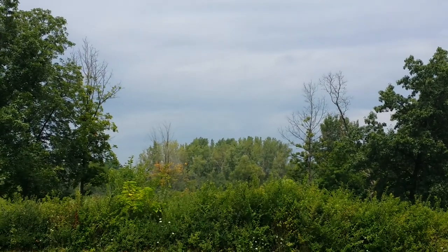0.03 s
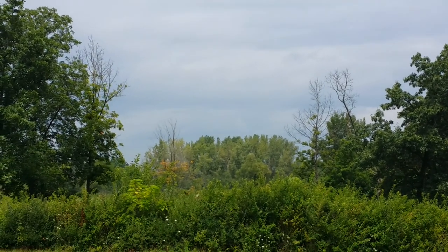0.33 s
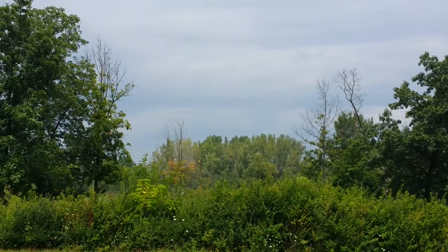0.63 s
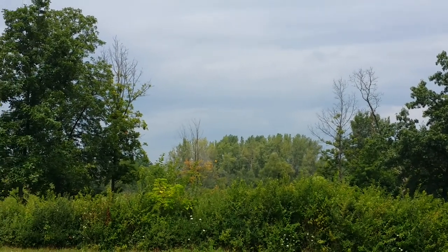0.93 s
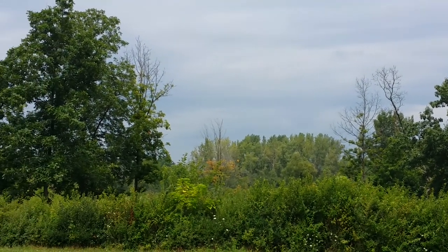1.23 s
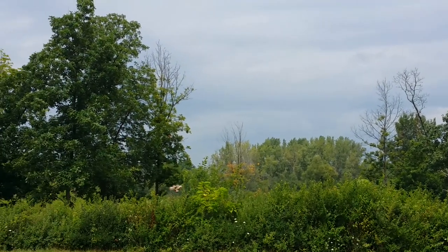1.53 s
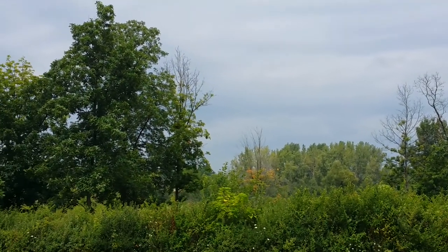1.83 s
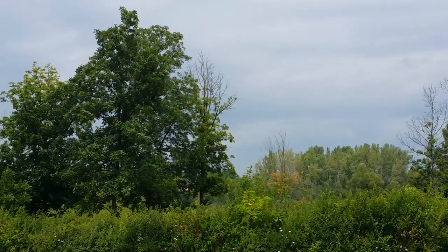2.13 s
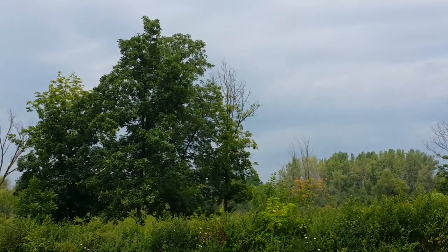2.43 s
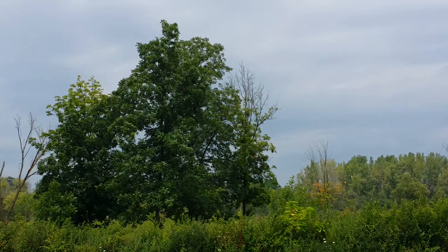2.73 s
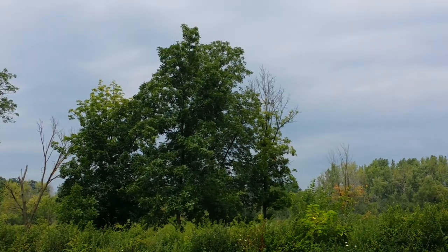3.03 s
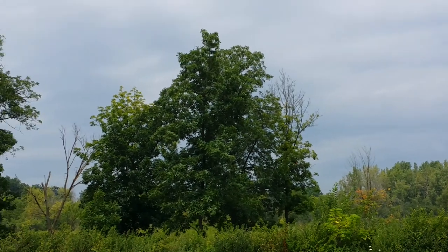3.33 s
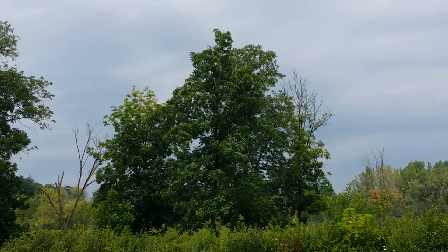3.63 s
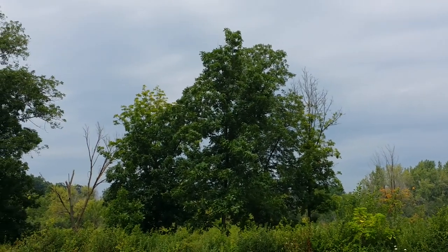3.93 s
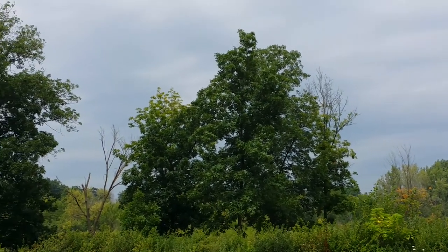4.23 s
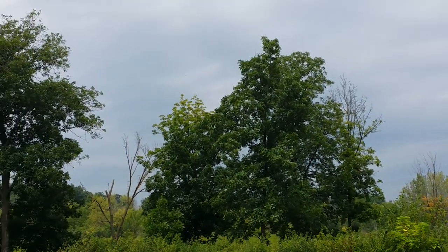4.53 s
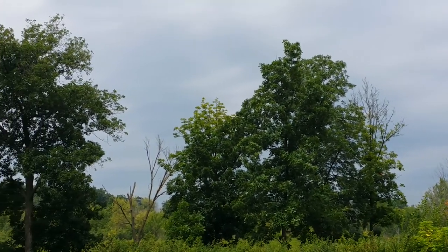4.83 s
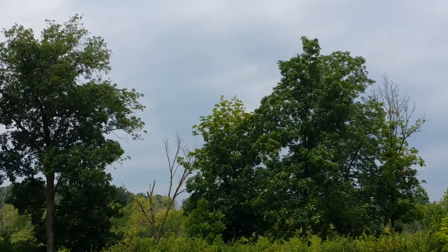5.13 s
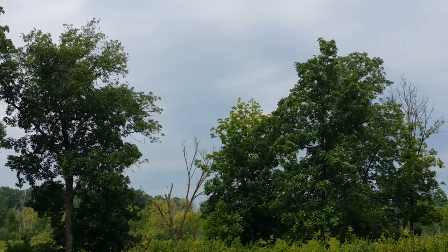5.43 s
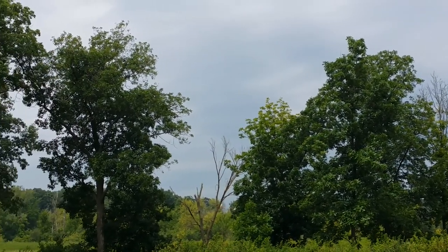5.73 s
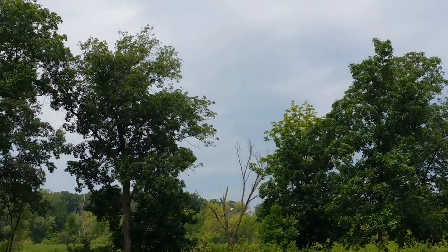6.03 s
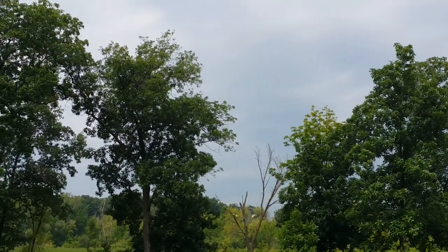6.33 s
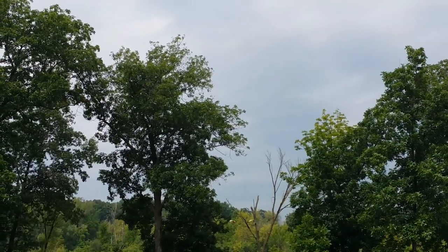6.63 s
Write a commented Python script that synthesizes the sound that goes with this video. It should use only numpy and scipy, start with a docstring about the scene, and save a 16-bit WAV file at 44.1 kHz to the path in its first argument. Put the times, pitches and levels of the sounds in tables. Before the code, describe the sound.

In an open meadow edged with trees, a pair of cranes gives three short duets of rolling rattles and brief bugles, each echoing off the tree line. Insects buzz shrilly throughout, strongest on the left and gradually fading. Sharp pops and clicks from handling hit the microphone, mostly in the first half, along with light gusts of wind. A faint machine hums far away, and a small bird twitters faintly near the end.

```python
"""A sandhill crane rattles and bugles across a meadow, and its mate joins in for three duets.
Slapping syrinx membranes ring their long windpipes; shrubs scatter the calls and the tree line answers.
Insects scrape their wings in the shrubs, a far machine hums, and late on a small bird twitters.
The hand-held camera turns away from the insects; handling pops and light wind hit its two
microphone ports."""
import sys
import numpy as np
from scipy import signal
from scipy.fft import rfft, irfft, next_fast_len
from scipy.io import wavfile
from scipy.ndimage import map_coordinates

SR = 44100
rng = np.random.default_rng(int(sys.argv[2]) if len(sys.argv) > 2 else 0)


def persist_wave(psi):
    """Save psi, clipped to +-1, as 16-bit WAV."""
    counts = np.round(np.clip(psi, -1, 1) * 32767).astype(np.int16)
    wavfile.write(sys.argv[1], SR, np.atleast_2d(counts).T)


N = 298998


def amp(db):
    """Decibels to gain."""
    return 10 ** (np.asarray(db) / 20)


def unit(x):
    """Scale to rms 1."""
    return x / np.sqrt(np.mean(x ** 2) + 1e-20)


def along(points, hz):
    """Read (frequency, value) points at hz, on a log axis."""
    freqs, values = np.transpose(points)
    return np.interp(np.log(hz + 1), np.log(freqs + 1), values)


def curves(rows):
    """One value per sample for each column after the time."""
    times, *columns = np.transpose(rows)
    return [np.interp(np.arange(N) / SR, times, column) for column in columns]


def wobble(rate, size=N):
    """A smooth random curve, rate knots a second."""
    knots = rng.standard_normal(int(size * rate / SR) + 4)
    return map_coordinates(knots, [np.arange(size) * rate / SR])


def cycles(hz):
    """Running phase in radians."""
    return 2 * np.pi * np.cumsum(hz) / SR


def coloured(x, spectrum):
    """x through a (frequency [Hz], level [dB]) spectrum, at rms 1."""
    size = x.shape[-1]
    m = next_fast_len(2 * size)
    gain = amp(along(spectrum, np.fft.rfftfreq(m, 1 / SR)))
    return unit(irfft(rfft(x, m) * gain, m)[..., :size])


def add(track, at, sound):
    """Mix a sound into a track, at a time in seconds."""
    start = max(0, round(at * SR))
    track[start:start + len(sound)] += sound[:N - start]


def glide(length, start, middle, end):
    """Progress 0-1 through a note, and its pitch curving through three points."""
    u = np.linspace(0, 1, max(64, int(length * SR)))
    return u, np.polyval(np.polyfit([0, .5, 1], [start, middle, end], 2), u)


def plateau(at, length, edge_s):
    """One smooth rise, hold and fall (0-1) on a scene-long track."""
    t = np.arange(N) / SR - at
    return np.sin(np.pi / 2 * np.clip(np.minimum(t, length - t) / edge_s + .25, 0, 1)) ** 2


# open air over the meadow: (frequency [Hz], density [dB])
AIR_SPECTRUM = [(25, -25), (70, 6), (150, -6), (300, -13.5), (500, -15), (1000, -14.5), (2000, -20.5),
                (3000, -22), (6000, -29.5), (12000, -27.5), (15200, -31.5), (16000, -49)]
def open_air():
    """A faint, wide wash, different at each port."""
    return amp(-52) * coloured(rng.standard_normal((2, N)), AIR_SPECTRUM)


# a machine far off, centred: (time [s], level [dB])
HUM_LEVEL = [(0, -60), (1.5, -51), (3.3, -48), (3.9, -48.5), (4.7, -48), (4.85, -62), (5.4, -65),
             (5.6, -48.5), (6.78, -53)]
# its partials: (multiple of the pitch, level [dB])
HUM_PARTIALS = [(.5, -31), (1, -3), (2, -23.5)]
def far_machine():
    """A low hum that wavers slightly in pitch and level."""
    hum_db, = curves(HUM_LEVEL)
    phase = cycles(140 * (1 + 0.0044 * wobble(3.65)))
    tone = unit(sum(amp(db) * np.sin(k * phase) for k, db in HUM_PARTIALS))
    return amp(hum_db - 2 + wobble(6.8)) * tone


# wind on the microphone: (time [s], length [s], port [0 left, 1 right], rumble [dB], eddies [dB])
PORT_GUSTS = [(0, 0.82, 0, -32, -32.5), (0.931, 0.13, 1, -35, -38), (1.573, 0.65, 0, -41.5, -46.5),
              (1.8, 0.35, 1, -37.5, -49), (2.408, 0.092, 1, -34.5, -61), (4.65, 1.23, 1, -53.5, -63),
              (5.82, 0.57, 0, -34.5, -55), (5.828, .25, 1, -30.5, -41), (6.052, 1.07, 1, -36, -52)]
# rumble between gusts: (left [dB], right [dB])
BREEZE = [-59, -53.5]
# buffeting at a port: (frequency [Hz], density [dB])
RUMBLE_SPECTRUM = [(20, -59), (45, -6), (75, 3.5), (140, -1.5), (200, -12), (300, -21.5), (500, -44),
                   (1200, -53)]
# small eddies in strong gusts: (frequency [Hz], density [dB])
EDDY_SPECTRUM = [(60, -39), (130, 4), (190, -1), (280, -12.5), (400, -21), (800, -39)]
def wind():
    """Each gust buffets one port, in separate bumps, over a faint breeze."""
    rumble_gain, eddy_gain = amp(BREEZE)[:, None] * np.ones(N), np.zeros((2, N))
    for at, length, port, rumble_db, eddy_db in PORT_GUSTS:
        gust = plateau(at, length, edge_s=0.1)
        rumble_gain[round(port)] += amp(rumble_db) * gust
        eddy_gain[round(port)] += amp(eddy_db) * gust
    bumps = unit(amp(8.2 * np.tanh([wobble(20), wobble(20)])))
    rumble = rumble_gain * coloured(rng.standard_normal((2, N)), RUMBLE_SPECTRUM)
    eddies = eddy_gain * coloured(rng.standard_normal((2, N)), EDDY_SPECTRUM)
    return amp(-1) * bumps * (rumble + eddies)


# static-like pops right at the microphone: (time [s], level [dB], port [0 left, 1 right], rise [s])
PORT_POPS = [(0.26, -10, 0, 0.000042), (0.49, -2.5, 1, 0.000084), (1.7844, -7, 0, 0.000043),
             (1.8895, -9.5, 0, 0.000042), (2.0096, -0.5, 0, 0.000062), (2.0621, -14, 0, 0.000045),
             (2.0863, -2, 0, 0.000048), (2.1109, -9.5, 0, 0.000022), (2.8168, 3.5, 1, 0.00017),
             (2.8705, -2.5, 0, 0.000024), (2.882, 1, 0, 0.00012), (2.8894, -4, 0, 0.000072),
             (3.1631, 0.5, 0, 0.000037), (3.5233, -3, 1, 0.00005), (5.5724, -21, 0, 0.000069)]
# the housing clicks by the right port: (time [s], level [dB])
HOUSING_CLICKS = [(1.5936, 0.5), (5.9610, -8)]
# fingers brush the housing on that side: (time [s], length [s], level [dB])
FINGER_BRUSHES = [(0.282, 0.089, -36.5), (2.653, 0.098, -37), (5.953, 0.034, -36), (6.238, 0.013, -42.5)]
# their friction: (frequency [Hz], density [dB])
BRUSH_SPECTRUM = [(300, -5), (900, 4.5), (2000, -5), (4500, -4), (8000, -9), (15000, -22)]
def handling():
    """Pops are pressure steps that swing back through the bass cut; the housing rings and rustles."""
    steps, housing = np.zeros((2, N)), np.zeros((2, N))
    t = np.arange(SR // 8) / SR
    for at, db, port, rise in PORT_POPS:
        add(steps[round(port)], at, amp(db + 1) * (1 - np.exp(-t / rise)) * np.exp(-t / 0.0022))
    for at, db in HOUSING_CLICKS:
        ring = np.cos(2 * np.pi * 780 * t) * amp(-60 * t / 0.0074)
        add(housing[1], at, amp(db) * ring * (1 - np.exp(-t / .00006)))
    for at, length, db in FINGER_BRUSHES:
        swell = np.hanning(int(length * SR))
        add(housing[1], at, amp(db) * swell * coloured(rng.standard_normal(len(swell)), BRUSH_SPECTRUM))
    bass_cut = signal.butter(4, 66, "high", fs=SR, output="sos")
    return signal.sosfilt(bass_cut, steps) + housing


# a faint bird, centred: (time [s], length [s], start [Hz], middle [Hz], end [Hz], level [dB])
BIRD_TWEETS = [(5.275, 0.055, 6520, 5200, 5100, -57), (5.462, .08, 3480, 3720, 4200, -67),
               (5.627, .12, 7100, 5320, 5070, -61.5), (5.843, 0.085, 3300, 3650, 3850, -67)]
def small_bird():
    """Thin slurred whistles with a slight quaver."""
    song = np.zeros(N)
    for at, length, start, middle, end, db in BIRD_TWEETS:
        u, pitch = glide(length, start, middle, end)
        whistle = np.sin(cycles(pitch * (1 + 0.014 * wobble(297, len(u)))))
        add(song, at, amp(db + 5) * np.sin(np.pi * u) * whistle)
    return song


def wing_buzz(spectrum, envelope, stroke_hz, chop):
    """Files scrape at the wing-stroke rate; many wings give many small resonances."""
    strokes = 1 + chop * np.cos(cycles(stroke_hz * (1 + 0.041 * wobble(25))))
    hz = np.arange(2000, 16000, 70)
    resonances = np.column_stack([hz, along(spectrum, hz) + 3.7 * rng.standard_normal(len(hz))])
    scrape = coloured(rng.standard_normal(N), [(1000, -70), *resonances])
    return unit(scrape * strokes * envelope * amp(0.62 * wobble(6.6)))


# the insect nearest the microphone sings: (time [s], length [s])
SINGER_BOUTS = [(-.032, 0.73), (1.156, 2.55)]
def singer_rhythm(tired_hz=17.2, fresh_extra_hz=3.82, tire_s=1):
    """The near insect's presence (0-1) and beat (-1 to 1), which slows as it tires in each bout."""
    presence, beat = np.zeros(N), np.zeros(N)
    for at, length in SINGER_BOUTS:
        t = np.maximum(np.arange(N) / SR - at, 0)
        beat_count = tired_hz * t + fresh_extra_hz * tire_s * (1 - np.exp(-t / tire_s))
        bout = plateau(at, length, edge_s=0.19)
        presence += bout
        beat -= bout * np.cos(2 * np.pi * beat_count)
    return presence, beat


# choruses in the shrubs on either side, fading as the microphone turns away: (time [s], level [dB])
LEFT_LEVEL = [(0, -34), (1.9, -35), (3.4, -36), (3.9, -38.5), (5.3, -39.5), (5.75, -44), (6.78, -45)]
RIGHT_LEVEL = [(0, -42), (.5, -41.5), (1.8, -45.5), (3, -49), (3.9, -57), (4.6, -52.5), (6.78, -55.5)]
# a narrow-voiced insect, at both ports: (time [s], level [dB])
THIN_LEVEL = [(0, -52), (3.7, -78), (4, -58.5), (4.6, -46.5), (5.1, -61), (5.6, -62)]
# wings of the choruses, the near singer and the narrow voice: (frequency [Hz], density [dB])
LEFT_WINGS = [(3000, -31), (4000, -17), (4600, -7), (5300, -5.5), (5750, -3.5), (6100, -2), (6550, 4),
              (7250, 0), (7700, -3), (9000, -20), (10200, -19.5), (13000, -69)]
RIGHT_WINGS = [(3000, -12), (4500, -8.5), (5700, -8), (7500, -9), (8600, 3), (9600, 1.5), (10300, -3.5),
               (11200, -9.5), (12000, -17.5), (14000, -16), (16000, -67)]
SINGER_WINGS = [(5600, -34.5), (6300, -3.5), (6600, 1.5), (7250, 3.5), (7700, -14), (8500, -32)]
THIN_WINGS = [(4800, -30), (5450, -28), (5720, -11), (6000, -17), (6500, -38)]
def insects():
    """A singer close on the left throbs over the chorus, then stops; a shriller group is on the right."""
    left_db, = curves(LEFT_LEVEL)
    right_db, = curves(RIGHT_LEVEL)
    thin_db, = curves(THIN_LEVEL)
    presence, beat = singer_rhythm()
    throb = np.sqrt(np.abs(1 + 0.48 * beat))  # the choruses pulse in time with the singer
    left = amp(left_db - 5) * wing_buzz(LEFT_WINGS, throb, stroke_hz=134.8, chop=0.25)
    right = amp(right_db - 0.5) * wing_buzz(RIGHT_WINGS, throb, stroke_hz=127.5, chop=0.21)
    spill_from_left = amp(left_db - 16) * wing_buzz(LEFT_WINGS, throb, stroke_hz=125.3, chop=0.72)
    singer = amp(-49.5) * wing_buzz(SINGER_WINGS, presence + 0.47 * beat, stroke_hz=136.5, chop=0.29)
    thin = amp(thin_db - 4) * coloured(rng.standard_normal((2, N)), THIN_WINGS)
    return np.array([left + singer, right + spill_from_left]) + thin


# colour of the echo off the tree line: (frequency [Hz], level [dB])
TREE_COLOUR = [(500, 3), (1000, 1), (1900, 3.5), (5000, 19)]
# its decay, longest in the bass: (frequency [Hz], time to fall 60 dB [s])
TREE_DECAY = [(300, 2.4), (1000, 1.08), (2000, 1.08), (5000, 1)]
def meadow(calls, shrubs_db=6, trees_db=-3.5, delay_s=0.029):
    """Near shrubs scatter the calls at once; the tree line answers later and dies slowly."""
    hz, t, noise = signal.stft(rng.standard_normal((2, SR)), SR, nperseg=256)
    shrubs = amp(shrubs_db - 60 * t / .13)
    arrival = 1 / (1 + np.exp((delay_s - t) / 0.018))
    decay_db = 60 * t / along(TREE_DECAY, hz)[:, None]
    trees = arrival * amp(trees_db + along(TREE_COLOUR, hz)[:, None] - decay_db)
    tail = signal.istft(noise * (shrubs + trees), SR, nperseg=256)[1] / np.sqrt(SR)
    return signal.fftconvolve(calls[None], tail, axes=1)[:, :N]


def windpipe(x, throat):
    """Each slap rings on in the windpipe (a minimum-phase filter); rms 1."""
    m = 2 * next_fast_len(len(x) + 2048)
    cepstrum = irfft(np.log(amp(along(throat, np.fft.rfftfreq(m, 1 / SR)))))
    response = np.exp(rfft(2 * cepstrum[:m // 2], m) - cepstrum[0])
    return unit(irfft(rfft(x, m) * response)[:len(x)])


def syrinx(hz, rough, throat, jitter, slap):
    """A harmonic-rich tone; when rough, the membranes slap once every four cycles."""
    phase = cycles(hz * (1 + jitter * (rough + .15) * wobble(413, len(hz))))
    slap_phase = phase / 4 + rng.uniform(0, 2 * np.pi)
    sway = rough * (0.96 * np.sin(slap_phase) + 0.59 * np.sin(2 * slap_phase))  # early and late cycles
    reach = 3 + 12 * rough  # smooth notes lose their upper harmonics
    tone = sum(np.cos(k * (phase + sway)) / (1 + (k / reach) ** 4) for k in range(1, 13))
    slaps = np.exp(slap * rough * np.cos(slap_phase))
    flutter = 1 + .5 * rough * np.tanh(wobble(344, len(hz)))
    return windpipe(tone * slaps * flutter, throat)


def rattle(rattles, hurry, chip_s):
    """Chips (time [s], level [dB], pitch [Hz], length [s]), each gap shorter than the last."""
    for start, end, first_gap, db, drop_db, first_hz, last_hz in rattles:
        gaps = first_gap * np.arange(1, 10) ** -hurry
        times = start + np.append(0, np.cumsum(gaps))
        times = times[times < end]
        for at, u in zip(times, np.linspace(0, 1, len(times))):
            level = db - drop_db * u ** 6.3 + 0.67 * rng.standard_normal()  # holds until the last chips
            hz = (first_hz + (last_hz - first_hz) * u) * (1 + 0.0073 * rng.standard_normal())
            yield at, level, hz, chip_s


def crane(chips, notes, throat, sag=0, chip_rough=0, chip_db=0, note_db=0, clearing=0):
    """Breath drives abrupt, sagging chips, and held notes that may start rough and then clear."""
    voice = np.zeros(N)
    for at, db, hz, length in chips:
        u, pitch = glide(length, hz * (1 + sag / 2), hz * (1 - sag / 2), hz * (1 - 2.63 * sag))
        breath = (1 - np.exp(-u / 0.016)) * (1 - u ** 2) ** 1.82
        chip = syrinx(pitch, chip_rough, throat, jitter=0.13, slap=0.97)
        add(voice, at, amp(db + chip_db) * breath * chip)
    for at, length, start, middle, end, db, rough in notes:
        u, pitch = glide(length, start, middle, end)
        breath = (1 - np.exp(-u / 0.017)) * (1 - u ** 4.6)
        cleared = clearing * (1 + np.tanh((u - 0.4) / 0.14)) / 2  # just before mid-note
        note = syrinx(pitch, rough * (1 - cleared), throat, jitter=0.042, slap=0.21)
        add(voice, at, amp(db + note_db) * breath * note)
    return voice


# held notes of the far birds, the lower crane and the higher crane:
# (time [s], length [s], start [Hz], middle [Hz], end [Hz], level [dB], roughness [0-1])
FAR_NOTES = [(6.402, 0.11, 880, 898, 867, -61.5, 0.34), (6.47, 0.12, 742, 760, 725, -66, 0.47),
             (6.6, 0.26, 832, 872, 782, -64, 0.75)]
LOW_GROWLS = [(0.27, 0.089, 695, 695.4, 665, -33, 1), (.585, 0.054, 850, 853, 860, -32, 0.1),
              (2.589, 0.067, 534, 573, 600, -45, 0.74), (2.741, 0.076, 687, 676, 730, -34.5, 0.72),
              (4.751, 0.077, 574, 612, 677, -45, 0.3), (4.91, 0.083, 688, 687, 737, -39, 0.83)]
HIGH_BUGLES = [(0.042, 0.065, 934, 940, 893, -27.5, 0.13), (0.967, 0.077, 947, 941, 894, -28.5, 0.14),
               (2.625, 0.035, 928, 974, 1110, -33.5, 0.42), (3.085, 0.06, 956, 953, 925, -27.5, 0.25),
               (5.259, 0.047, 958, 972, 960, -33, 0.26)]
# their windpipe colours: (frequency [Hz], level [dB])
FAR_WINDPIPE = [(500, -28), (900, -30), (1500, -3), (1800, 0), (2300, -5), (3000, -42), (6000, -52)]
LOW_WINDPIPE = [(300, -43), (500, -6), (700, -2.5), (880, 4.5), (1100, -4), (1400, 0), (1700, -8.5),
                (2050, -9.5), (2500, -21.5), (3300, -17), (4500, -28.5), (9000, -29)]
HIGH_WINDPIPE = [(300, -41.5), (600, -12.5), (880, 0), (1200, -8.5), (1500, -14.5), (1900, -13.5),
                 (2350, -32), (2700, -31), (2950, -28), (3600, -27.5), (5000, -35.5), (9000, -56)]
# the pair's rattles; a negative drop swells:
# (start [s], end [s], first gap [s], level [dB], final drop [dB], first pitch [Hz], last pitch [Hz])
LOW_RATTLE_RUNS = [(.405, .69, 0.061, -28, 3.8, 704, 674), (2.87, 3.19, .0595, -28, 10, 673.5, 712),
                   (5.05, 5.41, .059, -28.5, 13.5, 699, 765)]
HIGH_RATTLE_RUNS = [(0, .05, 0.03, -25, -1.5, 1118, 1111), (.695, .975, .0675, -25.5, 0, 1147, 1096),
                    (2.7324, 3.1, .0688, -24, -2, 1105, 1100), (4.8908, 5.26, .0697, -27, -2.5, 1161, 1122)]
# the pair as the microphone turns: (time [s], lean to the right [dB], treble above 1500 Hz [dB])
MIC_AIM = [(0, 1, 4), (1, 1.5, -0.5), (3, 0.9, -4.5), (5.3, 1, -6.5)]
def cranes():
    """The pair duets across the meadow, ahead and slightly right; others call from far off at the end."""
    high_chips = rattle(HIGH_RATTLE_RUNS, hurry=.29, chip_s=0.0267)
    high = crane(high_chips, HIGH_BUGLES, HIGH_WINDPIPE, sag=0.081, chip_rough=0.35,
                 chip_db=-3, note_db=1)
    low_chips = rattle(LOW_RATTLE_RUNS, hurry=.17, chip_s=0.026)
    low = crane(low_chips, LOW_GROWLS, LOW_WINDPIPE, sag=0.03, chip_rough=0.54,
                chip_db=-2, note_db=1.5, clearing=0.75)
    far = crane([], FAR_NOTES, FAR_WINDPIPE)
    pair = high + low
    lean_db, treble_db = curves(MIC_AIM)
    mellow = signal.sosfiltfilt(signal.butter(2, 1500, fs=SR, output="sos"), pair)
    direct = mellow + amp(treble_db) * (pair - mellow)
    return direct * amp([-lean_db, lean_db]) + far + meadow(pair + 2 * far)


def scene():
    """The meadow as it reaches the left and right ports."""
    return cranes() + insects() + small_bird() + handling() + wind() + open_air() + far_machine()


def record(dry):
    """The camera keeps nothing above 15.9 kHz."""
    m = next_fast_len(N + SR // 2)
    passband = np.fft.rfftfreq(m, 1 / SR) < 15900
    return irfft(rfft(dry, m) * passband, m)[:, :N]


dry = scene()
out = record(dry)
persist_wave(out)
```